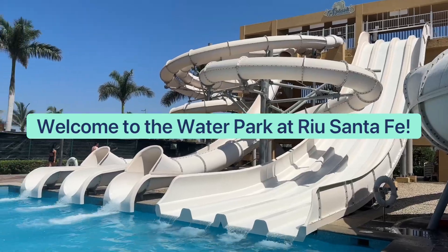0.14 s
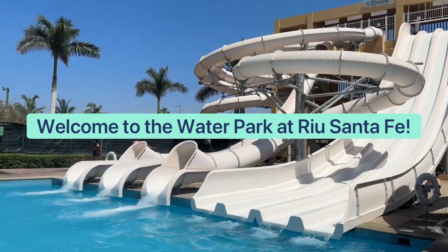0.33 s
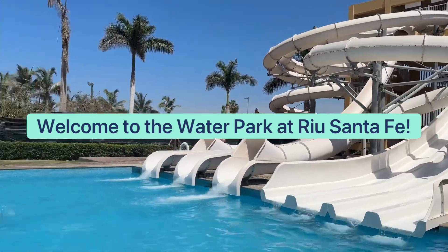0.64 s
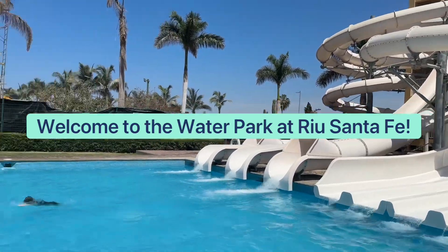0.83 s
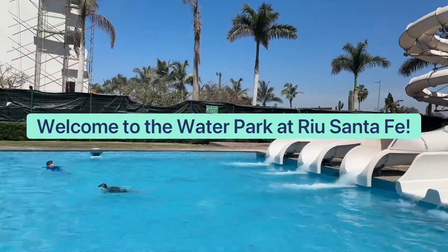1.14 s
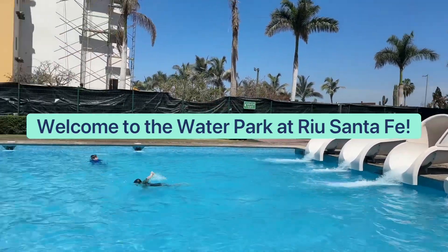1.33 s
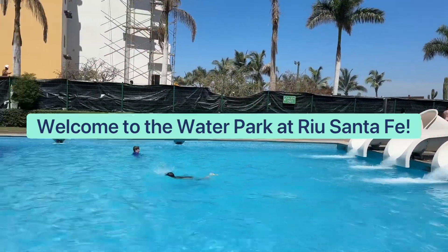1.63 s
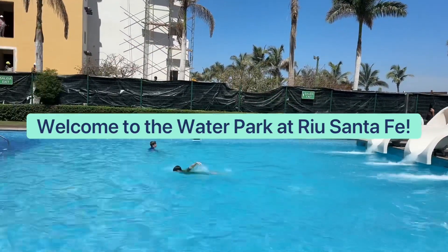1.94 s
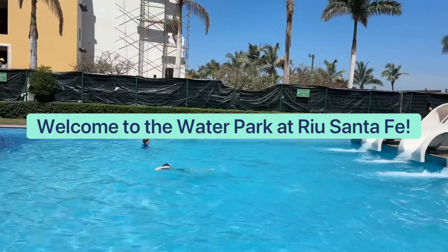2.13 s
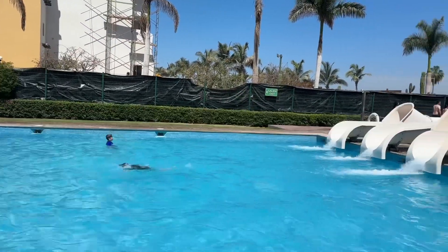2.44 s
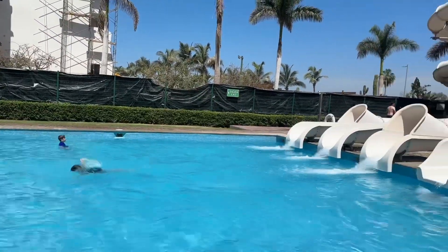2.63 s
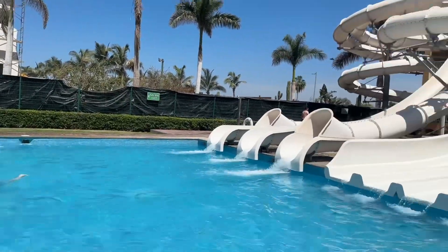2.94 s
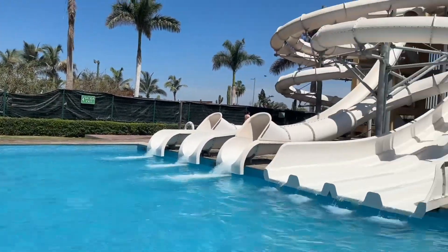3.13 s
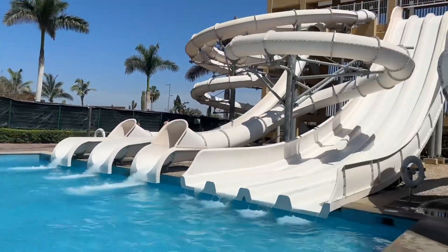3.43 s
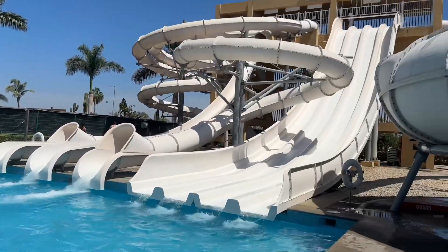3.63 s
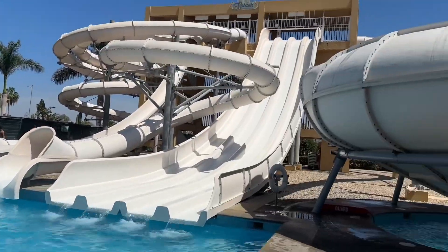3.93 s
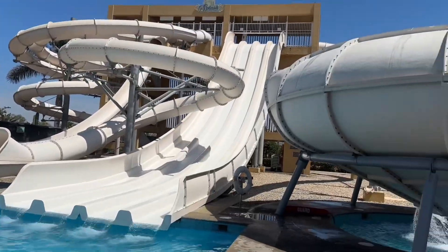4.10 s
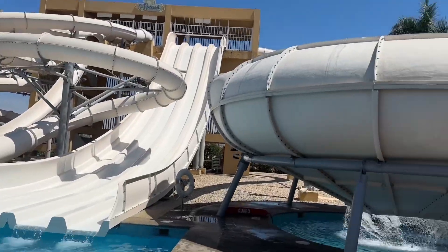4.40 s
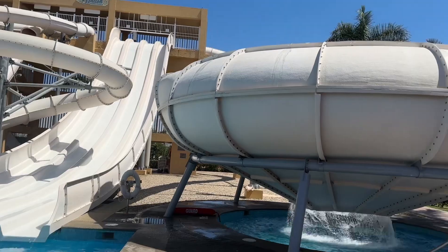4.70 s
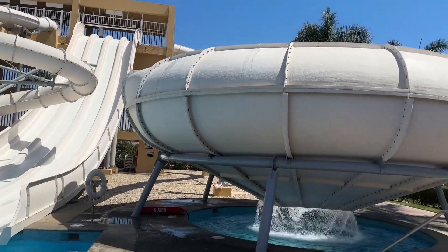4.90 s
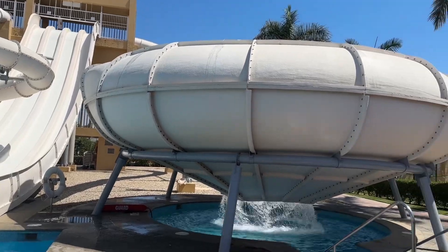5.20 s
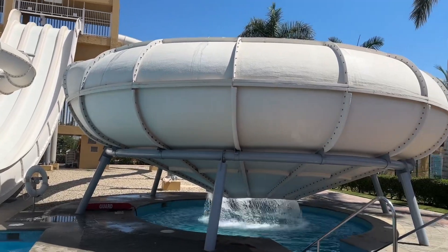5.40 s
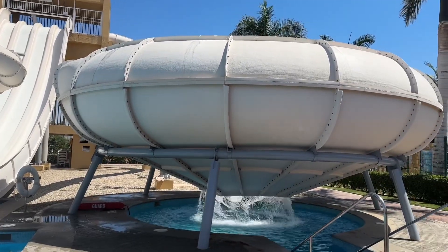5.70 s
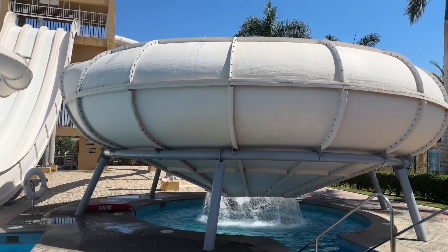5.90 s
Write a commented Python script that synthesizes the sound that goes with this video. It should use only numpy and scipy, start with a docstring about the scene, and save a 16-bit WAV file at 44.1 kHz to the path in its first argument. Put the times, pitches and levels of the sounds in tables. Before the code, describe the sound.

Water rushes steadily down slides and splashes into pools, a dense bright wash over a low hollow rumble, with faint gulps and droplets.

```python
"""First comes the rush of tube slides and racing lanes at an open-air water park, facing a spot between them.
A hand-held camera swings left to the open pool, back past the slides and lanes, and on to a funnel slide.
Each splash is a wash of noise with short droplet ticks and ringing bubbles. Below it, filtered noise makes
the plunging water churn and the tubes rumble, with a fluttering deep bass. The high hiss wavers, and soft
gliding notes, sizzling spray, booming gulps and single slaps of water come and go on top."""
import sys
import numpy as np
from scipy import signal
from scipy.fft import rfft, irfft, next_fast_len
from scipy.io import wavfile
from scipy.ndimage import uniform_filter1d, map_coordinates

SR = 44100
rng = np.random.default_rng(int(sys.argv[2]) if len(sys.argv) > 2 else 0)


def pcm_store(signal):
    """Save signal as 16-bit PCM."""
    levels = np.round(np.clip(np.atleast_2d(signal), -1, 1) * 32767)
    wavfile.write(sys.argv[1], SR, levels.astype(np.int16).T)


N = 266915

# The camera's pan and the loudness of the spray along the way:
# (time [s], heading to the right of the tube mouths [degrees], spray gain [dB])
CAMERA_PAN = [(0, 19, -1), (0.65, 4, -1.3), (0.82, -8.5, -0.5), (1, -14, -1.5), (1.25, -25, 0),
              (1.6, -51, 0.35), (2.6, -34, 0.35), (2.72, -16, 0), (2.92, -16, 0), (3.1, 6, -0.2),
              (3.3, 17, -0.5), (3.6, 12.5, -0.1), (4.3, 43.5, 0), (4.65, 55, 0), (4.9, 68, 0.2),
              (5.4, 78, -0.34), (6.05, 89, -0.5)]

# Colour of each splash at the two microphone ports, before its place and the pan change its level.
# Likeness says how far the ports agree, in step (in-phase) or a quarter cycle apart (quadrature).
# (frequency [Hz], level [dB per Hz], in-phase likeness [-1 to 1], quadrature likeness [-1 to 1],
#  left over right [dB])
SLIDES_COLOUR = [(650, -64.3, 0.29, 0.11, 3.4), (960, -63.0, 0.6, 0.05, 1.2), (1130, -63.8, 0.4, 0.1, 0.6),
                 (1230, -67.8, -0.3, 0.64, -0.8), (1420, -65.8, -0.1, 0.5, 1), (1650, -68, 0.1, 0.35, 1.8),
                 (2100, -73.6, 0.45, 0.1, 0), (2350, -74.8, 0.6, 0, -0.6), (2600, -73.4, 0.72, -0.13, -1.2),
                 (3000, -77.2, -0.14, -0.47, -0.4), (4000, -73.9, 0.06, -0.52, 2.6),
                 (4600, -72.2, 0.5, -0.35, 5.7), (5200, -74.4, 0.55, -0.15, 7.6),
                 (6000, -77.2, 0.31, 0.1, 3.8), (7200, -73.7, 0.22, -0.78, 2.1),
                 (7900, -70.7, -0.85, 0.13, -0.4), (8700, -69.8, -0.95, -0.05, 0),
                 (9400, -69.3, -0.85, -0.28, 0.4), (12000, -78.3, -0.26, -0.58, -0.2),
                 (14200, -83.5, 0.25, -0.3, 0), (15500, -90.5, 0.45, -0.04, 0.0)]
LANES_COLOUR = [(650, -65.6, 0.19, -0.19, 4.5), (1000, -63.5, 0.77, -0.07, 0.8),
                (1130, -64.6, 0.45, 0.1, 0.8), (1250, -67.6, -0.21, 0.34, 1.0), (1450, -66.8, 0, 0.4, 1.2),
                (1750, -68.3, 0.23, 0.52, 1.6), (2450, -72.2, 0.72, -0.05, -0.7),
                (3050, -75.6, 0.05, -0.2, 1.2), (3550, -73.4, 0.02, -0.25, 2.5),
                (4200, -76.2, 0.2, -0.4, 3.2), (4900, -74.4, 0.46, -0.39, 3.7),
                (5600, -79.0, 0.35, -0.25, 3.0), (6200, -81.2, 0.25, -0.12, 2.2),
                (7400, -73.7, -0.36, -0.61, 4.5), (8300, -71.6, -0.93, 0.13, -0.0),
                (9600, -70.9, -0.8, -0.4, 0.3), (12200, -77.5, -0.21, -0.65, 0.1),
                (15500, -96.2, 0.45, 0.35, 0.0)]
POOL_COLOUR = [(650, -65.0, 0.05, 0.4, -0.1), (1100, -64.9, 0.3, 0.62, 0.4),
               (1290, -68.4, -0.69, 0.25, 1.1), (1650, -69.6, -0.3, 0.49, 0.5),
               (2000, -71.4, -0.12, -0.15, -0.1), (2250, -74.2, -0.05, -0.25, 0.2),
               (2600, -73.4, 0.72, -0.26, 1.1), (3000, -74.7, 0.55, -0.3, 2.2),
               (3400, -77.6, 0.05, -0.37, 3.6), (3950, -78.6, -0.15, -0.35, 4.1),
               (5200, -76.1, 0.32, -0.22, 3.8), (6000, -78.4, 0.09, 0.35, 0.2),
               (7400, -78.7, 0.14, -0.47, 4.3), (8600, -75.2, -0.85, 0.19, 0.3),
               (9600, -77.0, -0.85, -0.18, -0.0), (12200, -83.9, -0.29, -0.53, 0.0),
               (15500, -95.6, 0.45, 0.15, 0.0)]
FUNNEL_COLOUR = [(650, -64.2, 0.13, -0.45, 4.0), (1000, -63.7, 0.63, -0.28, 3.2),
                 (1240, -68.5, -0.28, -0.1, 1.2), (1400, -66.5, 0.1, 0.2, 2.4),
                 (1700, -66.9, 0.47, 0.58, 3.1), (2000, -70.3, 0.65, 0.3, 1),
                 (2350, -69.3, 0.89, 0.05, -1.2), (2900, -72.8, 0.4, -0.3, -2.8),
                 (3400, -72.5, -0.11, -0.59, -0.8), (4700, -71.3, 0.62, -0.33, 4.5),
                 (6000, -77.0, 0.68, 0.15, 2.1), (7000, -80.5, 0.2, -0.36, 1.9),
                 (7900, -74.5, -0.85, -0.03, 1.1), (8700, -72.5, -0.95, 0, 0.2),
                 (9800, -74.9, -0.85, 0.01, -0.1), (12000, -79.3, -0.4, -0.58, 0.2),
                 (15500, -94.5, 0.45, 0.3, 0.0)]

# Where each splash lies and its own gain: (bearing [degrees], gain [dB])
SLIDES_PLACE = (4, -0.11)
LANES_PLACE = (36.8, 0)
POOL_PLACE = (-29.5, -0.1)
FUNNEL_PLACE = (82, -0.43)
SPLASH_BEAM_DEG = 13.2  # a splash fades as the camera turns this far from it

# Brief rises of the high hiss: (time [s], gain [dB])
HISS_RISES = [(0.22, 1), (0.37, 1.5), (0.44, 3), (0.53, 0.5), (0.67, 3.5), (2.25, 1.5), (3.29, 4.5),
              (3.4, 2), (3.99, 1), (4.2, 2), (4.36, 2), (4.56, 2.5), (5.95, 1)]
HISS_RISE_HALF_S = 0.037
# Lower edges of the high hiss bands that waver separately: (frequency [Hz])
HISS_EDGES = [6800, 8600, 11100, 12800]
WAVER_DB, WAVERS_PER_S = 1.8, 50  # dB for each unit of random wobble, and random points a second

# Water in the hollow tubes, shape only: (frequency [Hz], relative level [dB per Hz])
RUMBLE_COLOUR = [(20, -42), (26, -32), (35, -20), (44, -17), (52, -3.5), (62, 4), (72, 1.5), (85, 1),
                 (110, -1), (150, -11.5), (210, -18.5), (400, -90)]
RUMBLE_DB, EVENNESS = -42, 0.8  # level when the funnel is not faced; how far surges are evened out (0-1)
FUNNEL_RUMBLE_DB, FUNNEL_BEAM_DEG = 0.8, 24  # the hollow funnel adds rumble when roughly faced

# Air driven under the surface, shape only: (frequency [Hz], relative level [dB per Hz])
CHURN_COLOUR = [(82, -15), (130, -2.5), (270, -0.94), (370, -1.5), (480, -2), (560, -2.5), (730, -28),
                (1230, -120)]
CHURN_DB, CHURN_FACED_DB = -40.5, 2  # level heard from aside, and extra gain when faced
CHURN_BEARING_DEG, CHURN_BEAM_DEG = 36, 39

# How alike low sounds are at the two ports: (frequency [Hz], left-right likeness [0-1])
LOW_LIKENESS = [(60, .955), (150, .91), (300, .8), (550, .5)]

# The deepest bass, shape only: (frequency [Hz], relative level [dB per Hz])
DEEP_COLOUR = [(18, -34), (26, -16), (35, 2), (46, -1), (60, -14), (120, -72)]
# How loud the deepest bass is: (time [s], level [dB])
DEEP_LEVEL = [(0, -54), (1.3, -56), (2.2, -54), (2.7, -65), (4.3, -71), (4.9, -56), (5.6, -55), (5.9, -44)]

# Brief faint hollow notes over the churning water:
# (time [s], pitch [Hz], glide [octaves/s], arch [octaves/s^2], half length [s], peak level [dB])
GLUGS = [(0.018, 1350, 0, 0, .03, -41), (0.783, 162.6, -0.5, 2.5, 0.042, -38),
         (1.152, 377, -0.7, 11, 0.094, -41.5), (1.687, 558, .2, 0, 0.045, -46),
         (2.144, 235, 0.3, 0, 0.04, -45), (2.89, 747, 0.11, -0.5, 0.042, -37.5),
         (4.748, 1507, 0, -1.5, 0.027, -39)]

# Spray falling back on the pool in sizzling sheets:
# (time [s], centre [Hz], half length [s], level [dB], left over right [dB])
SIZZLES = [(0.5, 6700, .04, -47, 0), (0.85, 6600, 0.039, -45, 2), (1.05, 6560, .04, -45, 0),
           (2.75, 6550, 0.098, -45, 0), (2.94, 6500, .08, -47, 2), (3.055, 6400, .035, -44, 3),
           (3.08, 4570, 0.045, -53, 8), (3.315, 4750, .05, -43, 11), (3.56, 6400, .025, -49, 0),
           (3.7, 4950, 0.12, -48, 5)]
SIZZLE_WIDTH = 0.066  # half width, as a share of the centre

# Heavier gulps of water booming in the tubes: (time [s], pitch [Hz], half length [s], peak level [dB])
GULPS = [(0.658, 66, .04, -42), (1.172, 87, 0.049, -39), (1.931, 83, 0.041, -38), (3.142, 70, .03, -33),
         (3.47, 105, .035, -40), (3.613, 81, 0.031, -35), (5.055, 65, 0.06, -35), (5.193, 83, 0.024, -35)]

# Single slaps of water:
# (time [s], starting level [dB], centre [Hz], time to fall 60 dB [s], left over right [dB])
SLAPS = [(1.578, -39, 1990, 0.14, 2), (3.385, -33, 2520, 0.04, -12), (5.641, -36, 2570, .03, 0)]

# Colour of the sound both ports share, with a deep dip near 8.5 kHz: (frequency [Hz], gain [dB])
SHARED_COLOUR = [(420, 1.5), (540, 0.15), (760, 0.5), (1200, 0.1), (1650, 1), (2100, -1), (2600, 0.77),
                 (4000, -0.3), (5200, 0), (7300, 0.57), (8500, -17.5), (9900, -0.5), (15000, 0)]
TOP_HZ = 15750  # nothing is kept from here up


def amp(db):
    """Turn decibels into a plain multiplier."""
    return 10 ** (np.asarray(db) / 20)


def unit(x):
    """Scale a sound to an average strength (rms) of 1."""
    return x / np.sqrt(np.mean(x ** 2) + 1e-20)


def left_right(balance_db):
    """A pair of gains that make the left louder than the right by this many decibels."""
    return amp([[balance_db / 2], [-balance_db / 2]])


def along(points, hz):
    """Read each column of a table by frequency, on a log axis."""
    f, *columns = np.transpose(points)
    return [np.interp(np.log(hz + 1), np.log(f + 1), column) for column in columns]


def curves(rows):
    """Read each column after the time as one value per sample."""
    s, *columns = np.transpose(rows)
    return [np.interp(np.arange(N) / SR, s, column) for column in columns]


def spectrum(x):
    """Split a sound into frequencies, with silence added at the end as room for filtering."""
    size = 2 * next_fast_len(N // 2 + 4096)
    return np.fft.rfftfreq(size, 1 / SR), rfft(x, size)


def swell(s, half_length):
    """A smooth rise and fall around time s, 0-1."""
    return np.exp(-((np.arange(N) / SR - s) / half_length) ** 2)


def wobble(rate):
    """A smooth random curve through this many random points a second."""
    knots = rng.standard_normal(int(N * rate / SR) + 4)
    return map_coordinates(knots, [np.arange(N) * rate / SR])


def facing(bearing, beam):
    """How squarely the panning camera faces a bearing, 0-1."""
    heading = curves(CAMERA_PAN)[0]
    return np.exp(-.5 * ((heading - bearing) / beam) ** 2)


def bubbles(count, low_hz, high_hz, cycles, spread_db, rise, size):
    """A swarm of dying sine rings at random times, each rising in pitch as it nears the surface; rms 1."""
    when, pitch, strength, life = rng.random((count, 4)).T[:, :, None]
    hz = low_hz * (high_hz / low_hz) ** pitch
    ring_cycles = cycles * (.5 + life)
    age = np.arange(size) / SR * hz / ring_cycles  # at 1 the ring has fallen to a hundredth
    phase = 2 * np.pi * ring_cycles * age * (1 + rise * np.minimum(age, 1) / 2)
    loudness = hz * amp(spread_db * np.minimum(-np.log(1 - strength), 4))
    ring = loudness * np.exp(-np.log(100) * age) * np.sin(phase)
    index = (when * N).astype(int) + np.arange(size)
    return unit(np.bincount(index.ravel(), ring.ravel(), N)[:N])


def wash(patchy_db):
    """Rushing water as two noises, together of rms 1, whose bands swell and sink in patches."""
    z = signal.stft(rng.standard_normal((2, N)), nperseg=512)[2]
    patches = rng.standard_normal(z.shape[1:])
    patches = uniform_filter1d(patches, size=3, axis=0)  # smooth over frequency
    patches = uniform_filter1d(patches, size=5, axis=1)  # smooth over time
    noise = signal.istft(z * amp(patchy_db * unit(patches)), nperseg=512)[1]
    return unit(noise[:, :N])


def splash(table, drops_db, bubbles_db, spread_db, patchy_db, low_hz=560):
    """Spray noise, short droplet ticks and longer bubble rings, coloured and spread over the two ports."""
    drops = np.array([bubbles(count=10000, low_hz=1450, high_hz=13500, cycles=2.0, spread_db=spread_db,
                              rise=0.092, size=160) for _ in range(2)])
    plinks = np.array([bubbles(count=900, low_hz=1499, high_hz=6140, cycles=51, spread_db=3.2,
                               rise=0.063, size=1600) for _ in range(2)])
    water = unit(wash(patchy_db) + amp(drops_db) * drops + amp(bubbles_db) * plinks)
    hz, (left, other) = spectrum(water)
    db, in_phase, quadrature, balance_db = along(table, hz)
    likeness = in_phase + 1j * quadrature
    likeness = likeness / np.maximum(1, abs(likeness))
    # The right port hears part of the left sound, filled up with an independent one.
    right = likeness * left + np.sqrt(abs(1 - abs(likeness) ** 2)) * other
    low_cut = 1 / np.sqrt(1 + (low_hz / (hz + 1)) ** 10)
    colour = amp(db) * np.sqrt(SR / 2) * low_cut
    pair = np.array([left * amp(balance_db / 2), right * amp(-balance_db / 2)])
    return irfft(colour * pair)[:, :N]


def spray():
    """Four splashes share the sound power, each taking more of it as the camera turns to face it."""
    slides = splash(SLIDES_COLOUR, drops_db=-9.5, bubbles_db=-16.0, spread_db=1, patchy_db=1.6)
    lanes = splash(LANES_COLOUR, drops_db=-8.0, bubbles_db=-16.5, spread_db=1.5, patchy_db=1.5)
    pool = splash(POOL_COLOUR, drops_db=-12.0, bubbles_db=-22, spread_db=-4.5, patchy_db=2.0)
    funnel = splash(FUNNEL_COLOUR, drops_db=-8.5, bubbles_db=-17.0, spread_db=1.0, patchy_db=1.5)
    waters = [slides, lanes, pool, funnel]
    places = [SLIDES_PLACE, LANES_PLACE, POOL_PLACE, FUNNEL_PLACE]
    shares = np.array([facing(bearing, SPLASH_BEAM_DEG) for bearing, db in places])
    gains = np.sqrt(shares / shares.sum(axis=0))
    return sum(amp(db) * gain * water for (bearing, db), gain, water in zip(places, gains, waters))


def waver_hiss(water):
    """The hiss above 6.8 kHz rises at set times, and each band wavers in level on its own."""
    hz, z = spectrum(water)
    above = [irfft(z * (1 - 1 / (1 + (hz / edge) ** 16)))[:, :N] for edge in HISS_EDGES]
    bands = [low - high for low, high in zip(above, above[1:] + [0])]
    rises_db = sum(db * swell(s, HISS_RISE_HALF_S) for s, db in HISS_RISES)
    below = water - above[0]
    hiss = sum(band * amp(rises_db + WAVER_DB * wobble(WAVERS_PER_S)) for band in bands)
    return below + hiss


def low_roar(pair, colour):
    """Long waves reach both ports nearly alike, so most of the sound is shared; the shared part has rms 1."""
    hz, z = spectrum(pair)
    likeness = along(LOW_LIKENESS, hz)[0]
    turn = np.arccos(np.clip(likeness, -1, 1)) / 2
    weights = [np.cos(turn), np.sin(turn)]
    mid, side = irfft(z * amp(along(colour, hz)[0]) * weights)[:, :N]
    return np.array([mid + side, mid - side]) / np.std(mid)


def tube_rumble():
    """Water rumbles in the hollow tubes: low noise with its surges evened out, a little louder by the funnel."""
    rumble = low_roar(wash(patchy_db=-0.5), RUMBLE_COLOUR)
    surges = uniform_filter1d(np.mean(rumble ** 2, axis=0), size=SR // 8)
    rumble = unit(rumble / np.abs(surges) ** (EVENNESS / 2))
    rumble_db = RUMBLE_DB + FUNNEL_RUMBLE_DB * facing(FUNNEL_PLACE[0], FUNNEL_BEAM_DEG)
    return amp(rumble_db) * rumble


def plunge_churn():
    """Streams drive air under: low noise and big bubble rings churn, louder when faced."""
    gurgle = np.array([bubbles(count=600, low_hz=164.0, high_hz=576, cycles=22.0, spread_db=0.0,
                               rise=0.12, size=3500) for _ in range(2)])
    churn = low_roar(wash(patchy_db=0.0) + amp(-22.5) * gurgle, CHURN_COLOUR)
    churn_db = CHURN_DB + CHURN_FACED_DB * facing(CHURN_BEARING_DEG, CHURN_BEAM_DEG)
    return amp(churn_db) * churn * left_right(1)


def deep_bass():
    """A low flutter of filtered noise below the rumble comes and goes."""
    return amp(curves(DEEP_LEVEL)[0]) * low_roar(rng.standard_normal((2, N)), DEEP_COLOUR)


def glugs():
    """Soft sine notes glide in pitch as they swell and fade."""
    out = np.zeros(N)
    for s, hz, glide, arch, length, db in GLUGS:
        t = np.clip(np.arange(N) / SR - s, -.5, .5)
        pitch = hz * 2 ** (glide * t - arch * t ** 2)
        out += amp(db) * swell(s, length) * np.sin(2 * np.pi * np.cumsum(pitch) / SR)
    return out


def sizzles():
    """Sheets of fine drops patter down: narrow bands of hiss that swell and fade."""
    hz, z = spectrum(rng.standard_normal((2, N)))
    out = np.zeros((2, N))
    for s, centre, length, db, balance_db in SIZZLES:
        narrow = 1 / (1 + ((hz / centre - 1) / SIZZLE_WIDTH) ** 4)
        hiss = unit(irfft(z * narrow)[:, :N])
        out += amp(db) * swell(s, length) * hiss * left_right(balance_db)
    return out


def gulps():
    """Heavy gulps boom in the tubes: a few cycles of a deep sine stand out of the rumble."""
    t = np.arange(N) / SR
    out = np.zeros(N)
    for s, hz, length, db in GULPS:
        boom = np.sin(2 * np.pi * (hz * (t - s) + rng.random()))
        out += amp(db) * swell(s, length) * boom
    return out


def slaps():
    """A clump of water lands: a short, dying burst of noise around one pitch."""
    out, t = np.zeros((2, N + SR)), np.arange(SR // 4) / SR
    for s, db, hz, decay, balance_db in SLAPS:
        band = signal.butter(2, [hz / 1.4, hz * 1.4], "band", fs=SR, output="sos")
        noise = unit(signal.sosfilt(band, rng.standard_normal(len(t))))
        burst = noise * amp(db - 60 * t / decay)
        start = round(s * SR)
        out[:, start:start + len(t)] += burst * left_right(balance_db)
    return out[:, :N]


def scene():
    """All the water together."""
    spray_db = curves(CAMERA_PAN)[1]
    steady = amp(spray_db) * waver_hiss(spray()) + tube_rumble() + plunge_churn() + deep_bass()
    return steady + glugs() + sizzles() + gulps() + slaps()


def record(dry):
    """The sound the ports share is coloured by a table, with a deep dip near 8.5 kHz; the very top is cut."""
    hz, (left, right) = spectrum(dry)
    mid = (left + right) / 2 * amp(along(SHARED_COLOUR, hz)[0])
    side = (left - right) / 2
    return irfft(np.array([mid + side, mid - side]) * (hz < TOP_HZ))[:, :N]


dry = scene()
out = record(dry)
pcm_store(out)
```